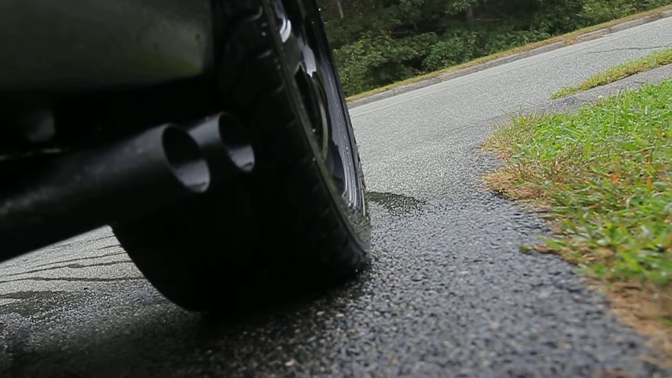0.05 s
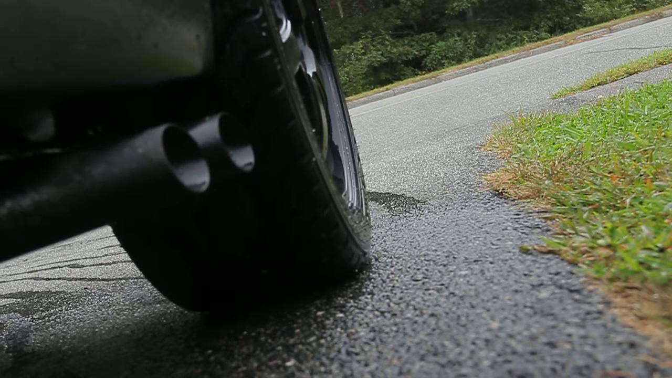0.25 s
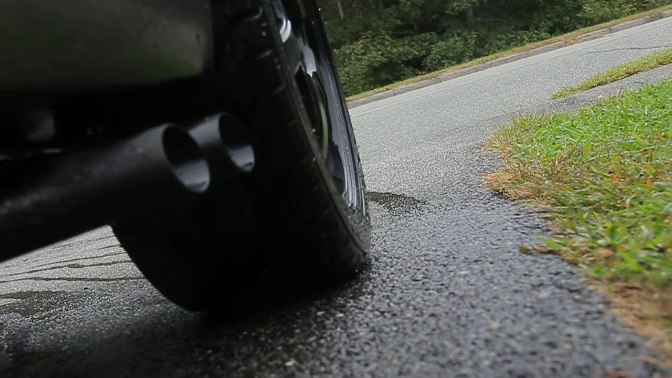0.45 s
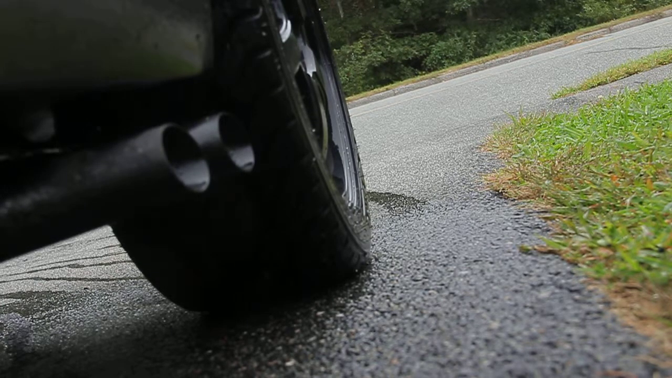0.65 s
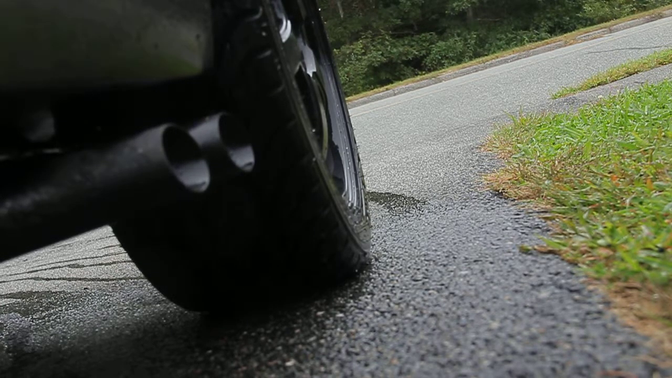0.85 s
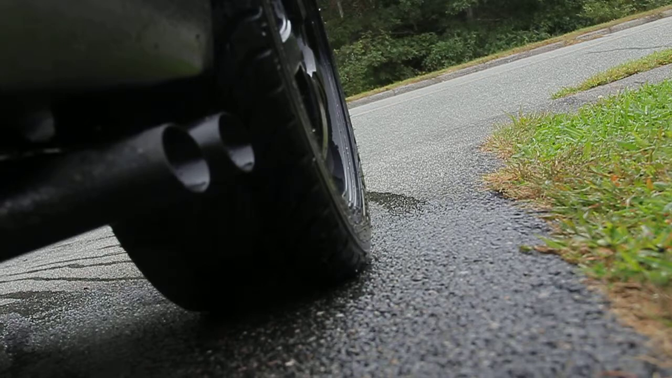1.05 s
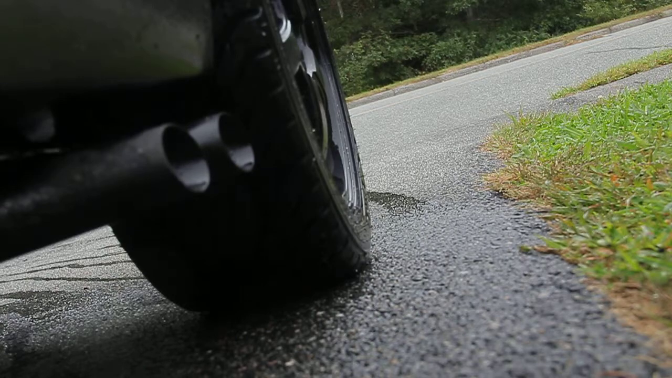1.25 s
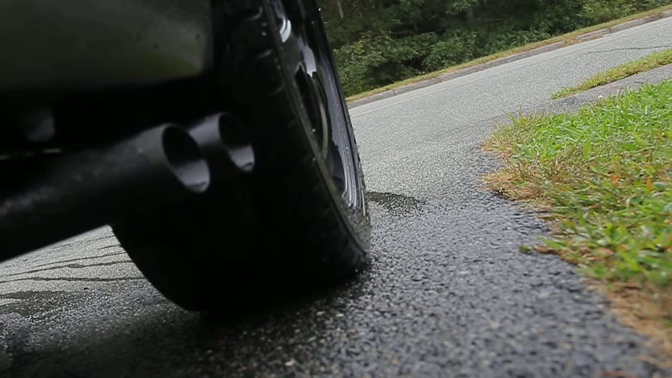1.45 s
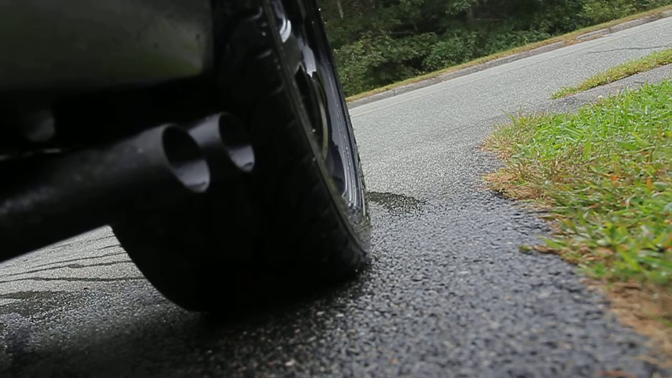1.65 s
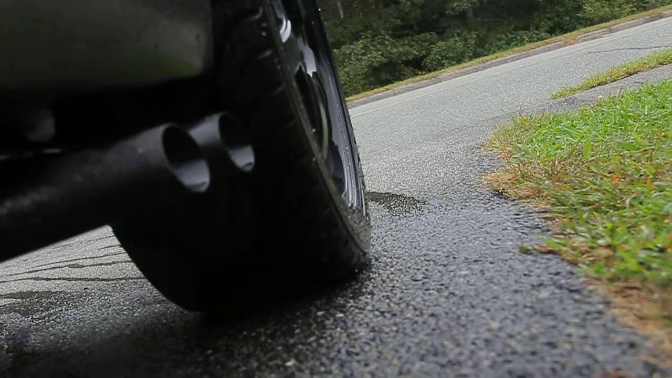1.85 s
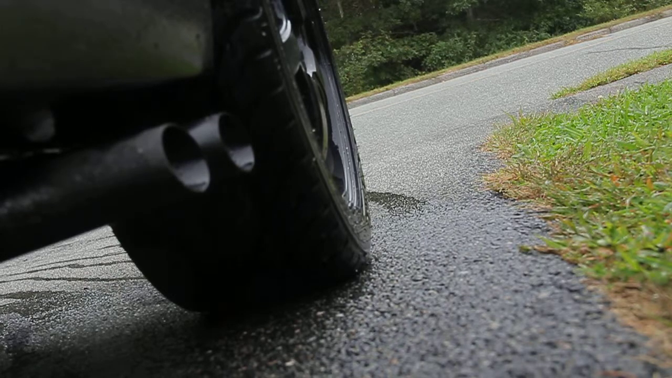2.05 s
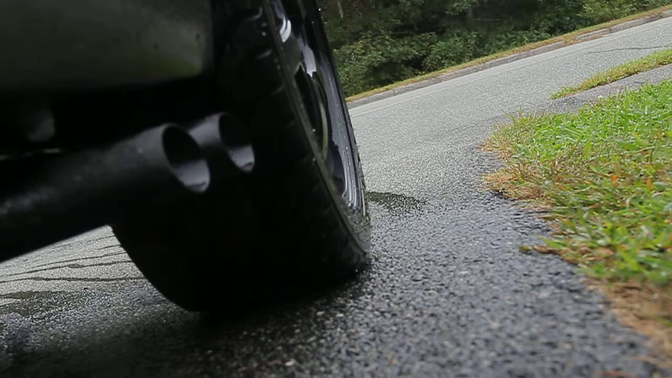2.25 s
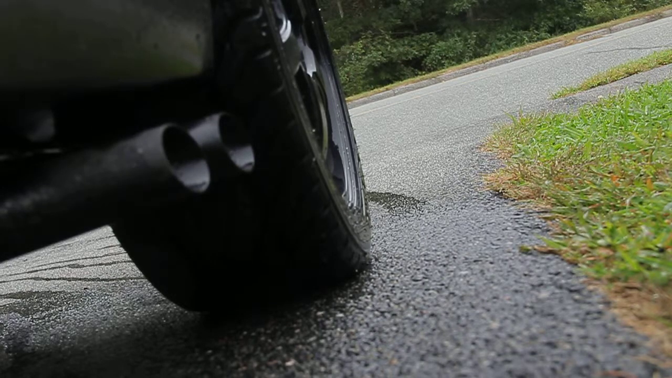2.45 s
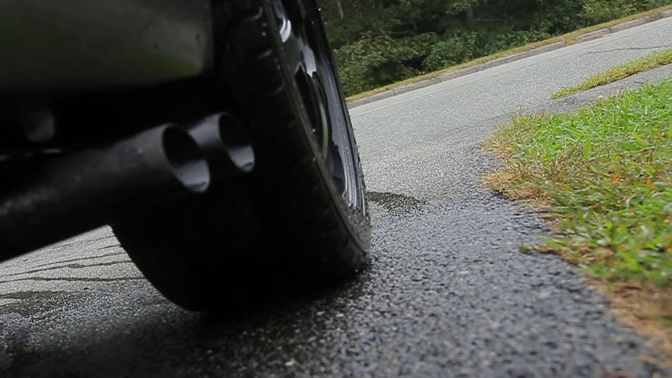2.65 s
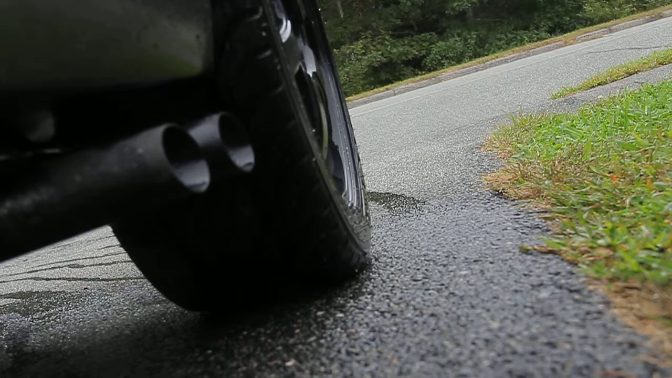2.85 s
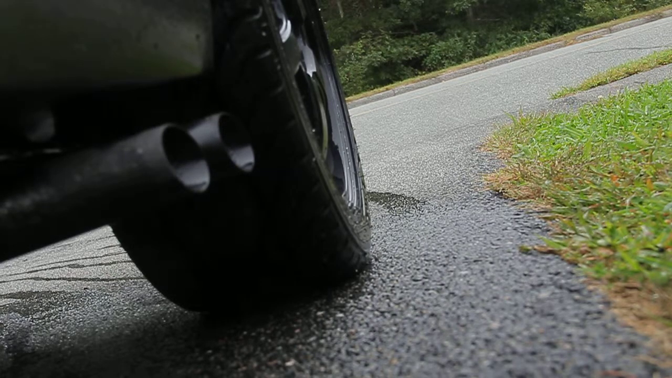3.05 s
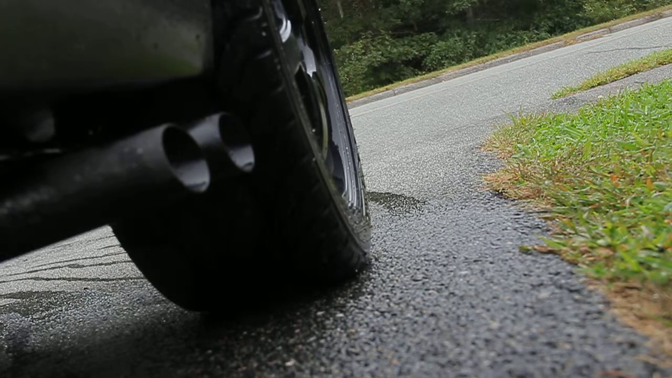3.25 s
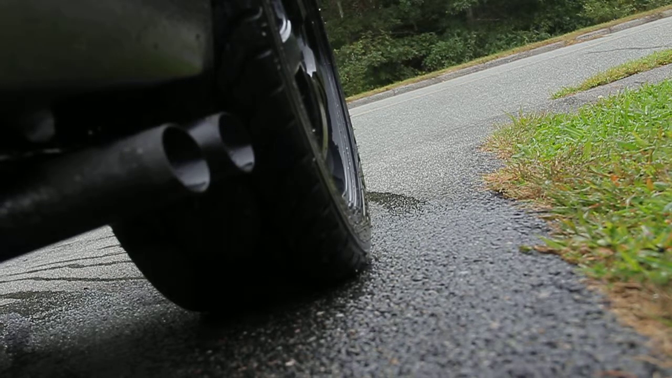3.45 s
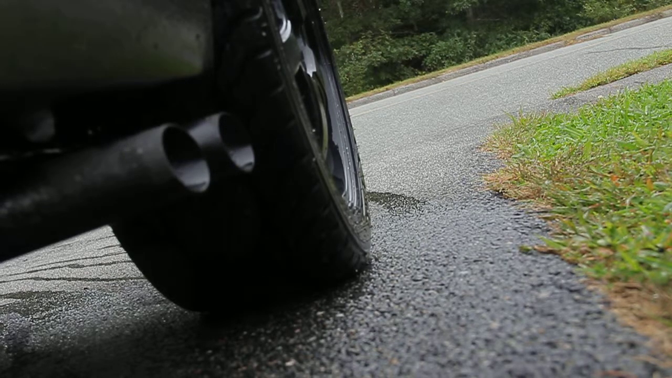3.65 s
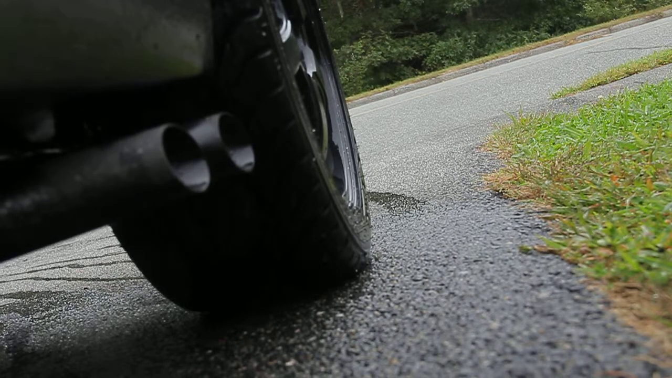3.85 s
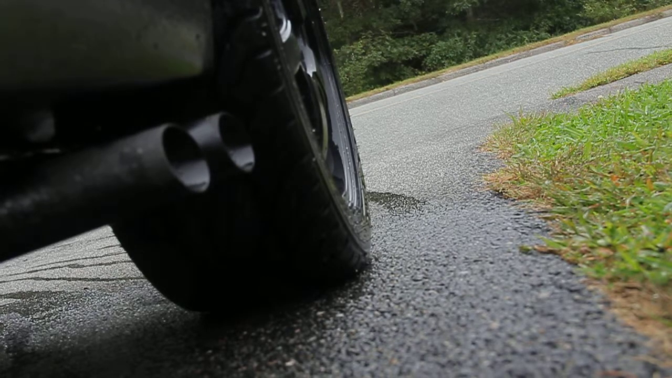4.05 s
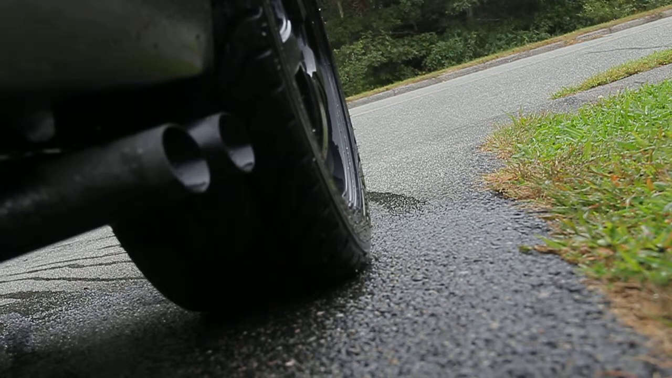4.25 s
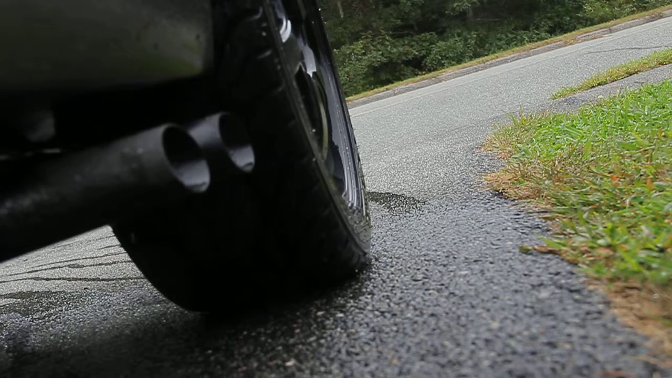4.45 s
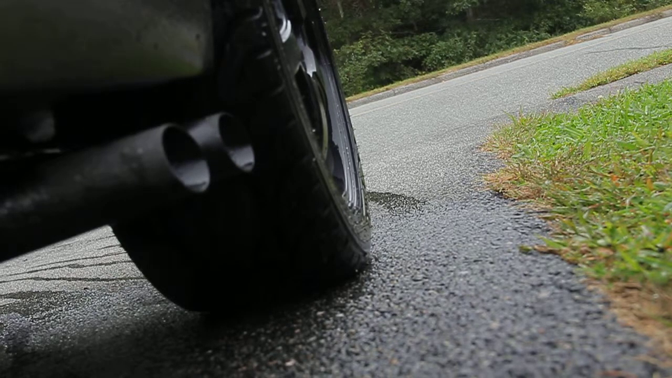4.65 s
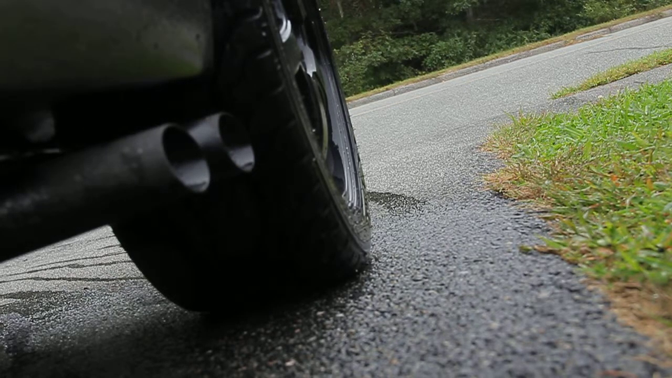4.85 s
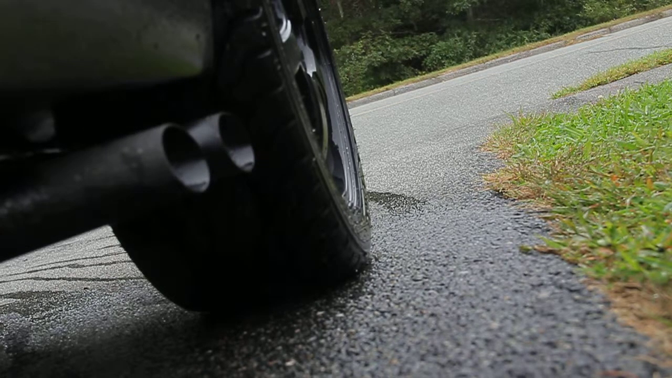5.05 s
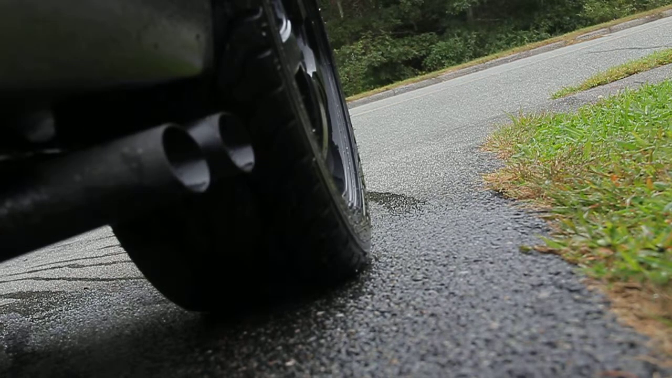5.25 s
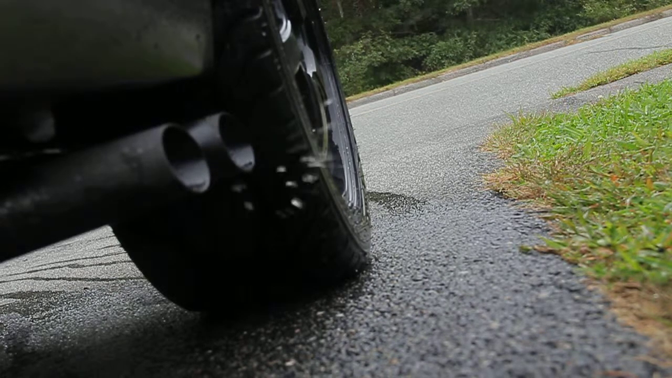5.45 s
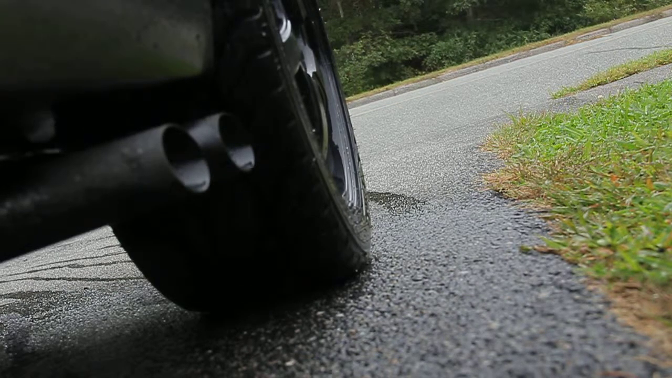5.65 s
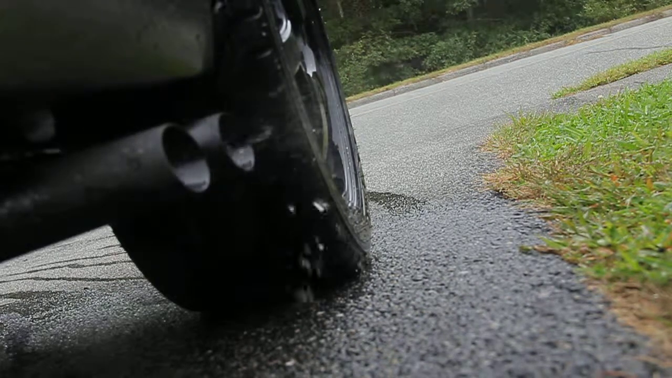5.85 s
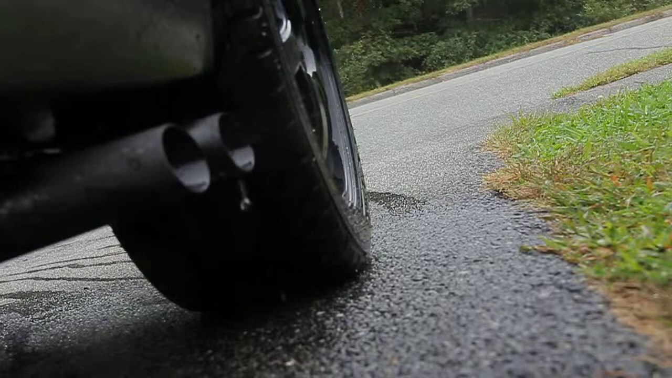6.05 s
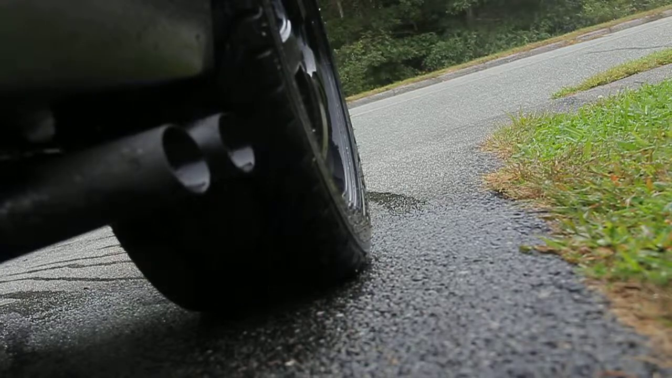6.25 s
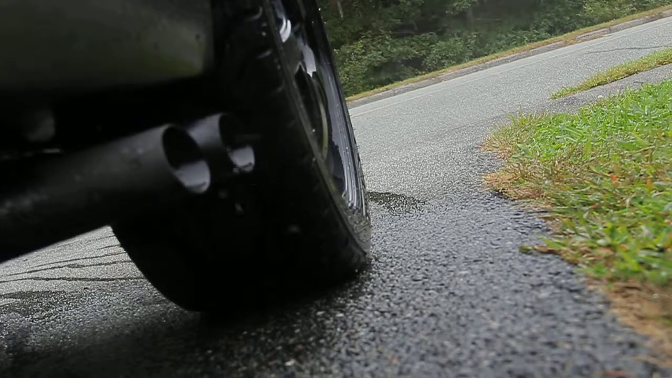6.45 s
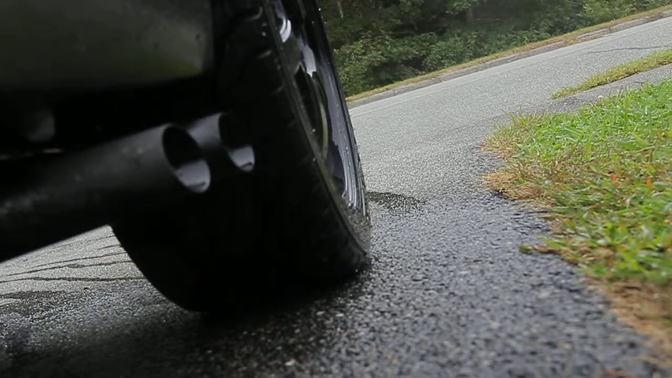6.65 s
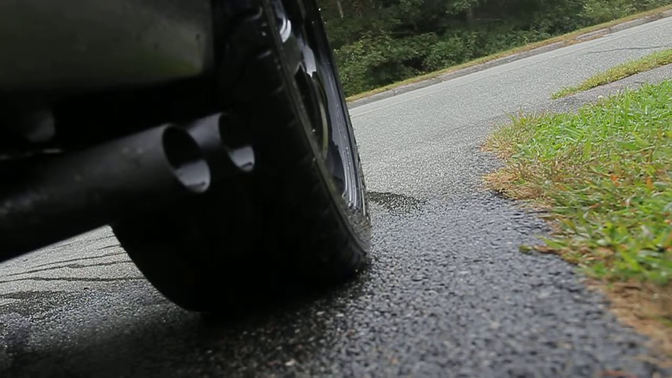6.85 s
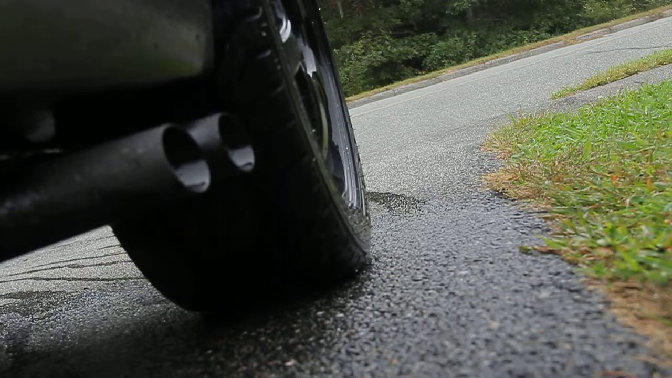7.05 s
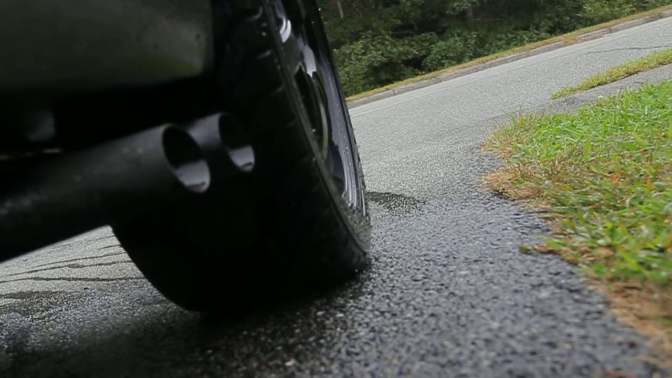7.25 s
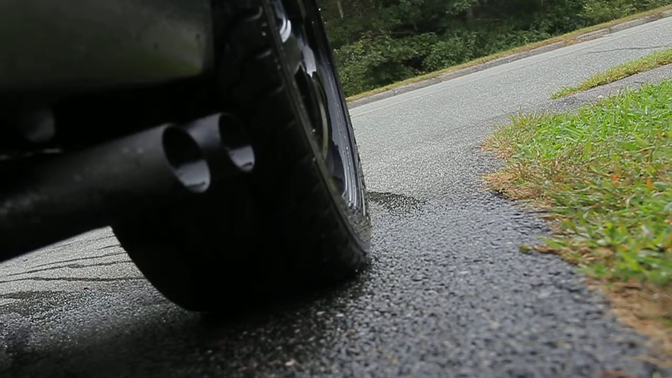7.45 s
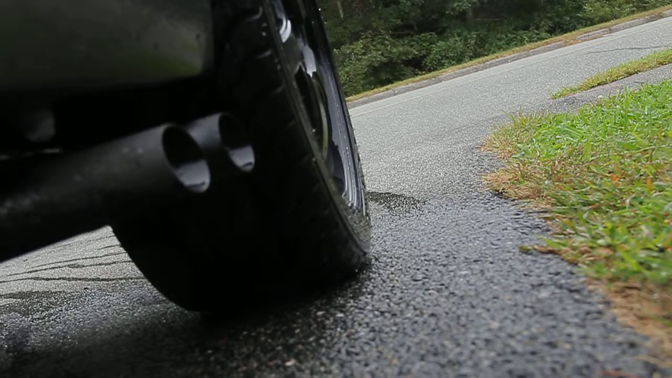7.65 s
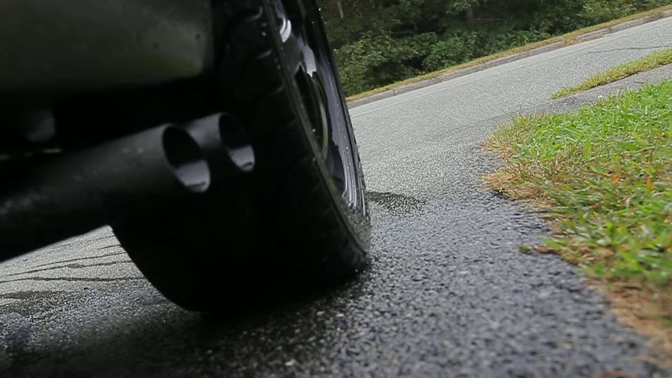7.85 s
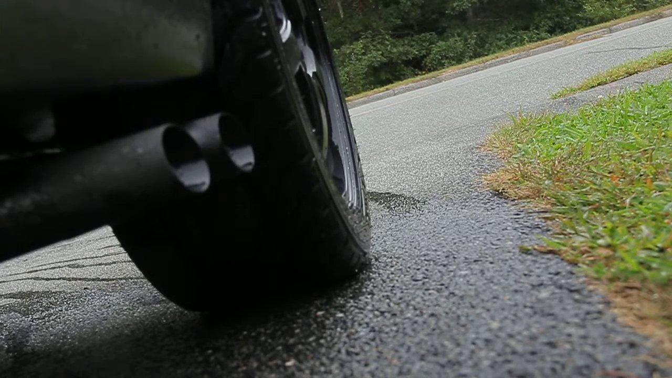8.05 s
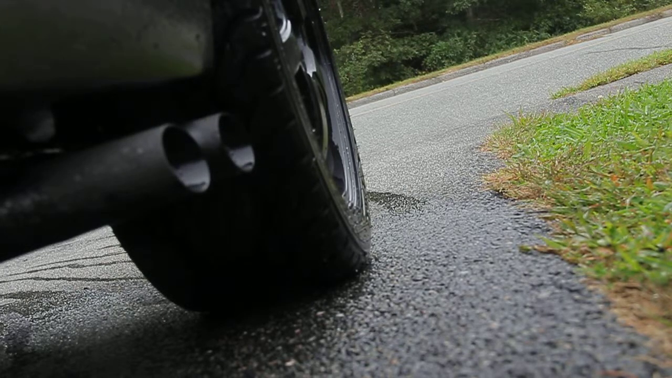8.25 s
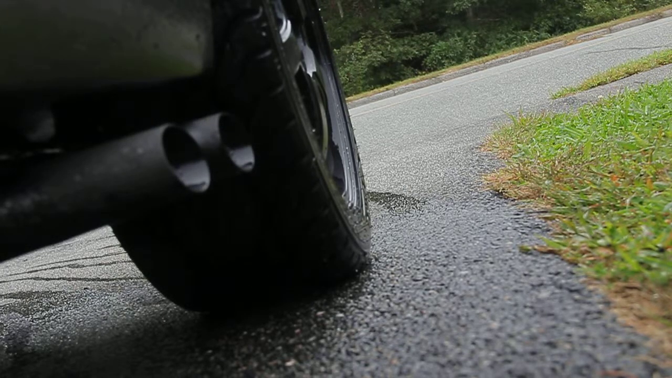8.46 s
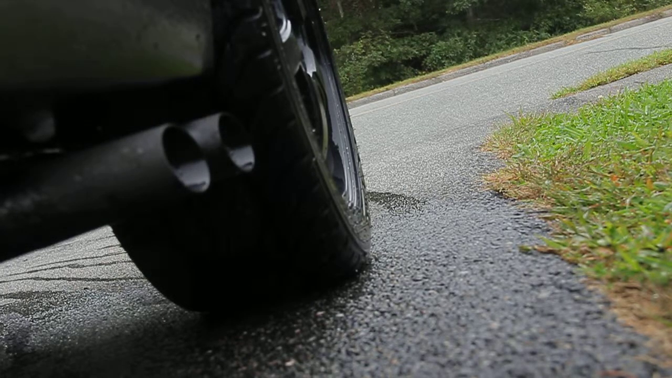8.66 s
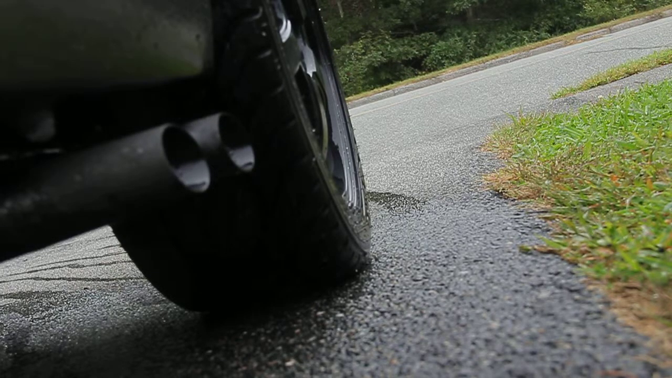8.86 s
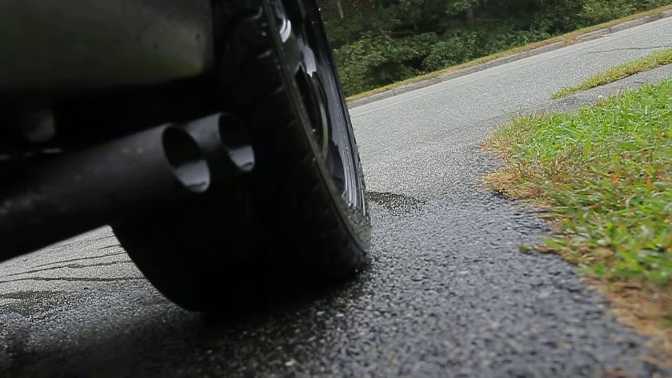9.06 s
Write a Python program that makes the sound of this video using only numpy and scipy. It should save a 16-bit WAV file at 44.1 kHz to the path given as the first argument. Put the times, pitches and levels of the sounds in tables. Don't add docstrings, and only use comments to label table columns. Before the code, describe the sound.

Outdoors, with the microphone close to a car's twin tailpipe, a four-cylinder engine idles in a low, slightly uneven throb with faint hiss. After about five seconds one throttle blip leaps into a loud, raspy bark, then falls through irregular pops and burbles. The engine sags very quiet and slow before settling back to idle.

```python
import sys
import numpy as np
from scipy import signal
from scipy.fft import rfft, irfft, next_fast_len
from scipy.io import wavfile
from scipy.ndimage import uniform_filter1d

SR = 44100
rng = np.random.default_rng(int(sys.argv[2]) if len(sys.argv) > 2 else 0)


def gain_from_decibels(decibels):
    exponent = np.asarray(decibels, float) / 20
    return 10 ** exponent


def log_audio(samples):
    frames = np.atleast_2d(samples).T
    limited = np.clip(frames, -1, 1)
    pcm = np.round(limited * 32767).astype(np.int16)
    wavfile.write(sys.argv[1], SR, pcm)


N = 401310
LEAD = SR // 4
TIME = np.arange(-LEAD, N) / SR
M = len(TIME)
CRACK_LAG_S = 0.0005

# time in seconds, firing rate in Hz.
SPEED = [(0, 37.79), (2.31, 37.51), (2.42, 36.41), (2.81, 36.45), (2.91, 35.56), (3.98, 34.33),
         (4.32, 34.92), (4.79, 33.19), (5.1, 34.22), (5.22, 42.45), (5.44, 80.85), (5.54, 87.96),
         (5.68, 85.77), (6.11, 66.79), (6.54, 54.35), (7.08, 34.68), (7.62, 25.69), (8.75, 34.22)]
# frequency in Hz, width in Hz, then level in dB for all firings,
# for alternate firings, for one odd cylinder and for a pop.
PIPE = [(78, 17, -33, -52.5, -49.5, -36), (99.5, 61.5, -1.5, -30.5, -39, -11), (150.1, 30, 8, -14, -34, 0),
        (205.5, 86.5, -4.5, -19.5, -40.5, -17), (264.7, 38.7, 3.5, 4, -22.5, 10.5)]
RINGING = [(342, 35, -16.5, -6.5, -31, 7), (372.3, 25.9, 7, 4.5, 9.5, -20),
           (469.1, 59.7, -4.5, -2.5, -14, 5), (509, 36, -7.5, -35.5, -26.5, -15)]
# frequency in Hz, width in Hz, level for firings in dB, level for a pop in dB.
BARK = [(637.6, 75, 0, -8), (752, 97, -3, -11.5), (870, 217, -12.5, -21), (1002, 30, -5, -19)]
RASP = [(1238, 314, -5.5, -28.5), (1583, 330, -10.5, -28), (1899, 83, -5, -25), (2074, 1200, -10.5, -34.5),
        (2700, 310, -10, -39.5), (3064, 380, -12.5, -38), (3720, 860, -17.5, -43.5), (4150, 490, -23, -49)]
# time in seconds, length in seconds, pitch in Hz, level in dB.
WHISTLE = (5.2, .03, 11150, -64)


def evened(x, seconds=None):
    if seconds is None:
        return x / np.sqrt(np.mean(x ** 2) + 1e-20)
    size = round(seconds * SR)
    power = uniform_filter1d(uniform_filter1d(x ** 2, size), size)
    return x / np.sqrt(abs(power) + 1e-20)


def curves(rows):
    s, *columns = np.transpose(rows)
    return [np.interp(TIME, s, c) for c in columns]


def causal(gain):
    log_gain = np.log(np.maximum(np.r_[gain, gain[-2:0:-1]], 1e-6))
    spectrum = np.exp(np.conj(signal.hilbert(log_gain)))
    return np.fft.ifft(spectrum).real[:len(gain) // 2]


def ring(x, modes, column, steep=1.324):
    hz = np.fft.rfftfreq(2 ** 15, 1 / SR)
    power = 0
    for mode in modes:
        off_centre = 2 * (hz - mode[0]) / mode[1]
        power = power + gain_from_decibels(mode[column]) ** 2 / (1 + off_centre ** 2) ** (2 * steep)
    return signal.oaconvolve(x, causal(np.sqrt(power)))[:len(x)]


def shaped(points):
    f, db = np.transpose(points)
    hz = np.fft.rfftfreq(M, 1 / SR)
    gain = gain_from_decibels(np.interp(np.log(hz + 1), np.log(f), db))
    return evened(irfft(rfft(rng.standard_normal(M)) * gain, M))


def clicks(s, size):
    at = np.clip(s * SR + LEAD, 0, M - 2)
    whole = at.astype(int)
    early = np.bincount(whole, size * (1 - at + whole), M)
    late = np.bincount(whole + 1, size * (at - whole), M)
    return early + late


def firings():
    turns = np.cumsum(curves(SPEED)[0]) / SR
    turns = turns - turns[LEAD] + 0.09
    number = np.arange(int(turns[0]), int(turns[-1]))
    return np.interp(number, turns, TIME), number, rng.standard_normal((len(number), 5))


def throttle():
    # opens in seconds, rise in seconds, hold in seconds, closing in seconds.
    blip = (5.09, 0.21, 0.13, 0.19)
    s, rise, hold, closing = blip
    return np.interp(TIME, s + np.cumsum([0, rise, hold, closing]), [0, 1, 1, 0])


def fuelling():
    # start in seconds, unevenness 0-1, burn as a factor on idle, bass in dB.
    fuel_states = [
        (5.5, 0.03, 2.9, -13.5),
        (5.658, 0.37, 0.53, -7),
        (5.747, 0.14, 1.23, 6),
        (5.965, 0.38, 0.26, -7),
        (6.02, 0.06, 2.6, 7),
        (6.158, 0.52, 0.96, 2.5),
        (6.585, 0.28, 0.19, 6),
        (6.9, 0.01, 0.85, 0),
        (7.4, 0.11, 0.98, 3),
        (8.4, 0.06, 1.08, -0.2),
    ]
    steady_uneven, full_burn_hz, switch_s = 0.03, 42, 0.02
    s, uneven, burn, bass_db = np.transpose(fuel_states)
    state = np.searchsorted(s, TIME) - 1
    powered = np.maximum(curves(SPEED)[0] / full_burn_hz, 1)
    steps = np.where(state < 0, [steady_uneven + 0 * TIME, powered, 0 * TIME],
                     [np.clip(uneven[state], 0, 1), burn[state], bass_db[state]])
    return uniform_filter1d(steps, round(switch_s * SR), axis=1)


def levels():
    # time in seconds, effort in dB over idle.
    gas_flow = [(0, 4), (2.5, 2), (3.2, 0), (4.0, -1), (5.05, -0.5), (5.14, 1.5), (5.29, 18), (5.37, 20.5),
                (5.68, 20), (5.78, 12), (6.1, 9), (6.35, 5.5), (6.75, -0.5), (7.1, -9), (7.6, -15.5),
                (7.9, -11), (8.3, -2), (9.1, -1)]
    # idle level in dB, dB per dB of effort, dB at open throttle, dB per tenfold speed, least level in dB.
    layers = [
        (-34, 0.6862, 1, -4, -44.5),
        (-49.5, 0.9985, -1.3, 4, -68),
        (-64.5, 1.26, 0.5, 3, -66),
        (-63, 0.0831, 13.5, 28.5, -81.5),
    ]
    # time in seconds, half length in seconds, swell of the throb in dB, swell of the upper modes in dB.
    burbles = [
        (5.744, 0.02, 2, 2),
        (5.983, .07, 2.5, 2.5),
        (6.188, 0.043, 2.5, 7),
        (6.295, 0.025, 8, 7.5),
        (6.41, 0.029, 5, 5),
        (6.49, 0.052, 6.5, 13),
        (6.63, 0.15, 3.5, 5.5),
        (6.731, .03, -8.5, -4),
        (6.798, 0.016, -10, -3),
        (6.323, 0.014, -11, -7),
    ]
    burble_share = (1.75, 1, 0.13)
    speed, effort = curves(SPEED)[0], curves(gas_flow)[0]
    opening = throttle()
    db = []
    for idle_db, follow, open_db, rise_db, least_db in layers:
        driven_db = idle_db + follow * effort + open_db * opening + rise_db * np.log10(speed / 35)
        db.append(20 * np.log10(np.hypot(gain_from_decibels(driven_db), gain_from_decibels(least_db))))
    db = np.array(db)
    tuned_hz, tuned_width_hz, tuned_db = 149.4, 9.6, 3
    off_hz = tuned_hz - speed * np.round(tuned_hz / speed)
    db[0] += tuned_db / (1 + (off_hz / tuned_width_hz) ** 2)
    for s, half, low_db, high_db in burbles:
        swell = np.maximum(1 - abs(TIME - s) / half, 0)
        db += np.outer([low_db, *np.multiply(high_db, burble_share)], swell)
    return db


def throb(s, number, chance, modes, order=1):
    path_lag = (0, .0044, .002)
    uneven, lit = (np.interp(s, TIME, c) for c in fuelling()[:2])
    s = s + 0.004 * uneven * chance[:, 0]
    size = gain_from_decibels(8 * uneven * chance[:, 1])
    alternate = (-1.) ** number
    patterns = (lit ** order, alternate, 3.1 * (number % 4 == 0) - 1 - alternate)
    out = 0
    for k, (pattern, lag) in enumerate(zip(patterns, path_lag)):
        out = out + ring(clicks(s + lag, size * pattern), modes, column=k + 2)
    mouth_lead = 0.22
    out = (signal.hilbert(out, next_fast_len(M))[:M] * np.exp(2j * np.pi * mouth_lead)).real
    return -evened(out, seconds=0.08)


def rumble():
    # frequency in Hz, level in dB per Hz.
    rumble_spectrum = [(20, -19), (80, 0.5), (150, -3.5), (270, -4.5), (400, 14), (700, -1.5),
                       (1500, -27.5), (5000, -64)]
    return gain_from_decibels(-33) * shaped(rumble_spectrum)


def cracks(s, cylinder_db, chance, modes, tonal):
    decay_s, spread_db = 0.005, 4
    train = clicks(s + CRACK_LAG_S, gain_from_decibels(cylinder_db + spread_db * chance))
    puff = np.exp(-np.arange(SR // 20) / SR / decay_s)
    gate = evened(signal.oaconvolve(train, puff)[:M], seconds=0.12)
    idle_share, open_share = 0.22, 0.69
    share = np.clip(idle_share + (open_share - idle_share) * throttle(), 0, 1)
    flow = (1 - share + share * gate) * rng.standard_normal(M)
    knock = share * evened(ring(train, modes, column=2, steep=1.0), seconds=0.076)
    return evened(evened(ring(flow, modes, column=2, steep=0.73)) + tonal * knock, seconds=0.23)


def bark(s, number, chance):
    bark_cylinders = [-9.5, 1, -7, -6.5]
    odd = 1 - 0.7 * np.interp(s, TIME, throttle())
    return cracks(s, odd * np.take(bark_cylinders, number % 4), odd * chance[:, 2], BARK, tonal=3)


def rasp(s, number, chance):
    rasp_cylinders = [-7.5, -2, -5.5, -5.5]
    # frequency in Hz, width in Hz, level in dB.
    loaded_modes = [(970, 156, 1.5), (2040, 770, -1.5), (3170, 750, -3), (3910, 620, 1.5)]
    plain = cracks(s, np.take(rasp_cylinders, number % 4), chance[:, 3], RASP, tonal=0.6)
    loaded = 0.75 * throttle()
    return (1 - loaded) * plain + loaded * evened(ring(plain, loaded_modes, column=2, steep=1.0))


def hiss(s, chance, rasp_db):
    # frequency in Hz, level in dB per Hz.
    hiss_spectrum = [(2500, -28), (4000, -7), (5500, -6), (7000, -10.5), (9000, -11), (11000, -14),
                     (13000, -18), (15500, -27)]
    idle_db, rise_db, under_rasp_db = -71.5, 24, -24.5
    speed = curves(SPEED)[0]
    gaining = np.gradient(uniform_filter1d(speed, SR // 12)) * SR
    flow_db = idle_db + rise_db * np.log10(speed / 36) + 0.02 * np.clip(gaining, -60, 150)
    intake_db, intake_rise_s, intake_until_s, intake_fade_s = 2.5, 0.04, 6.5, 0.053
    rush_in = (TIME - WHISTLE[0]) / intake_rise_s + 0.5
    rush_out = (intake_until_s - TIME) / intake_fade_s + 1
    flow_db += intake_db * np.clip(np.minimum(rush_in, rush_out), 0, 1)
    level = np.hypot(gain_from_decibels(flow_db), gain_from_decibels(rasp_db + under_rasp_db))
    train = clicks(s + CRACK_LAG_S, gain_from_decibels(4.1 * chance))
    puffs = signal.oaconvolve(train, np.exp(-np.arange(900) / 200))[:M]
    return level * shaped(hiss_spectrum) * evened(1 + 0.2 * evened(puffs, seconds=0.1))


def whistle():
    s, length, hz, db = WHISTLE
    u = np.clip((TIME - s) / length + 0.5, 0, None)
    fuzz = ring(rng.standard_normal(M), [(hz, 220, 0)], column=2, steep=0.92)
    return gain_from_decibels(db) * evened(fuzz) * (2 * u) ** 2 * np.exp(2 - 4 * u)


def pops():
    # time in seconds, peak in dB, brightness in dB.
    afterfire = [(5.699, -14.5, -3), (5.722, -12.5, -5), (5.774, -12, -9), (5.784, -7, -1), (5.98, -17, 0),
                 (6.013, -23, -4.5), (6.155, -10.5, 2), (6.201, -10, 5), (6.249, -18.5, 5),
                 (6.361, -44, 13), (6.404, -18, -4.5), (6.413, -25.5, 1), (6.458, -17, 0.5),
                 (6.476, -18, -19), (6.498, -13, -8), (6.597, -35, -10), (6.656, -28.5, -2),
                 (6.749, -25.5, -25), (6.817, -29.5, -21)]
    s, peak_db, bright_db = np.transpose(afterfire)
    t = np.arange(SR // 6) / SR
    body = PIPE + RINGING + [(f, w, 0, 0, 0, db) for f, w, _, db in BARK]
    low = ring(1. * (t == 0), body, column=5, steep=0.94)
    thump = signal.oaconvolve(clicks(s, gain_from_decibels(peak_db)), low)[:M]
    burst = np.exp(-t / 0.003) + 0.6 * np.exp(-t / 0.011)
    roar = signal.oaconvolve(clicks(s + 0.00096, gain_from_decibels(peak_db + bright_db)), burst)[:M]
    roar = roar * rng.choice([-1., 1.], M)
    high = ring(roar, BARK + RASP, column=3, steep=0.95)
    return (gain_from_decibels(-18.0) * high - thump) / abs(low).max()


def scene():
    throb_db, ringing_db, bark_db, rasp_db = levels()
    s, number, chance = firings()
    low = throb(s, number, chance, PIPE)
    bass = signal.sosfiltfilt(signal.butter(3, 110, fs=SR, output="sos"), low)
    bass_gain = gain_from_decibels(fuelling()[2])
    engine = gain_from_decibels(throb_db) * (low + (bass_gain - 1) * bass + rumble())
    engine += gain_from_decibels(ringing_db) * throb(s, number, 2 * chance, RINGING, order=2)
    engine += gain_from_decibels(bark_db) * bark(s, number, chance)
    engine += gain_from_decibels(rasp_db) * rasp(s, number, chance)
    mix = engine + hiss(s, chance[:, 3], rasp_db) + whistle() + pops()
    return mix[None, LEAD:]


def band_limit(x):
    return signal.sosfilt(signal.butter(12, 15660, fs=SR, output="sos"), x)


def record(dry):
    cut = signal.sosfilt(signal.butter(3, 50, "high", fs=SR, output="sos"), dry)
    cut = signal.oaconvolve(cut, signal.firwin(255, 15900, fs=SR)[None], "same")
    return band_limit(cut)


dry = scene()
out = record(dry)
log_audio(out)
```